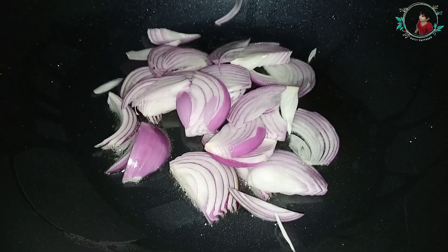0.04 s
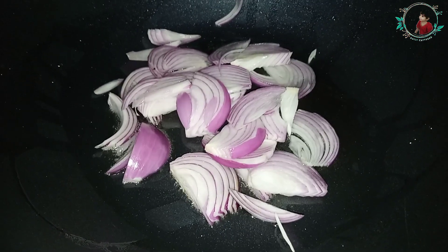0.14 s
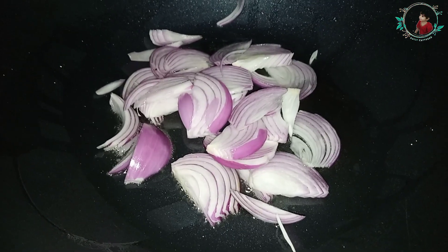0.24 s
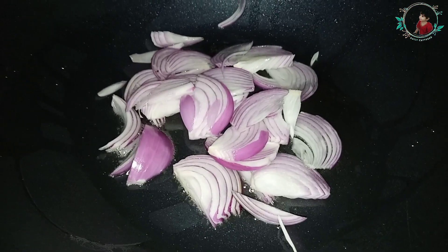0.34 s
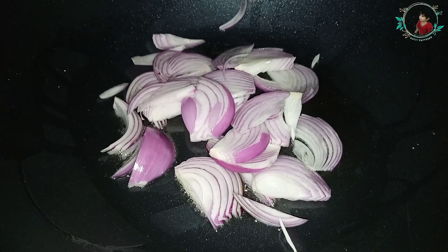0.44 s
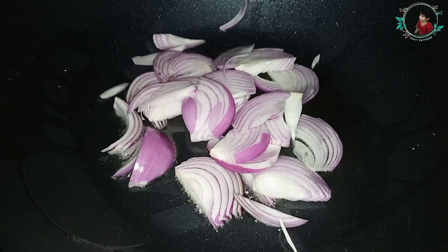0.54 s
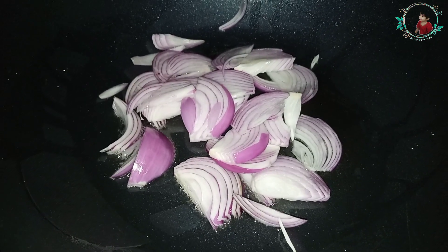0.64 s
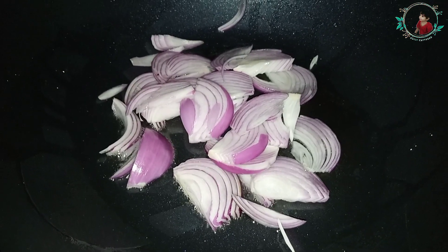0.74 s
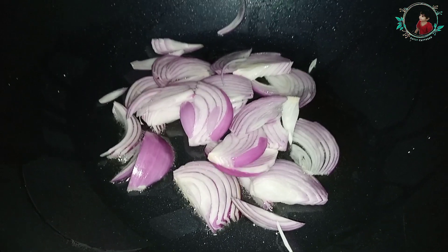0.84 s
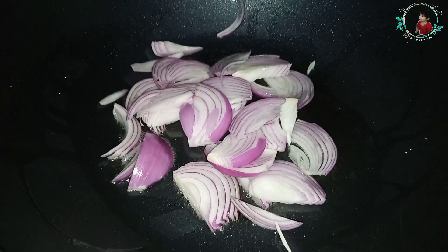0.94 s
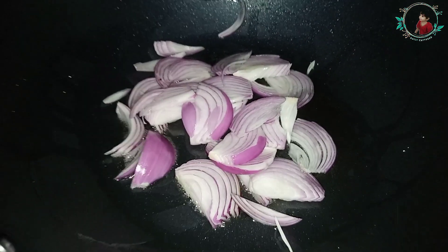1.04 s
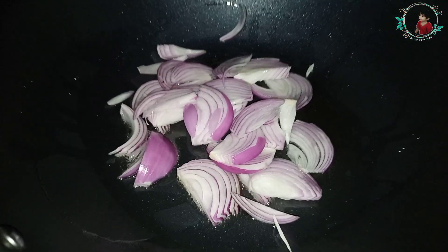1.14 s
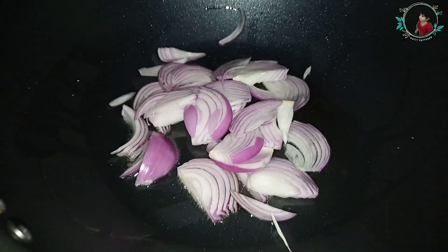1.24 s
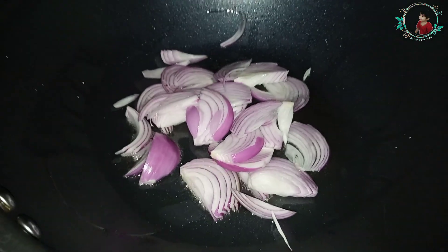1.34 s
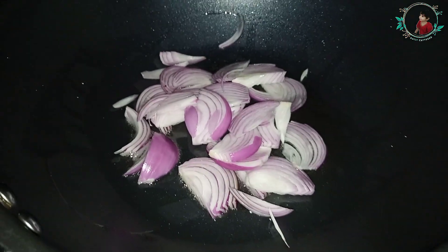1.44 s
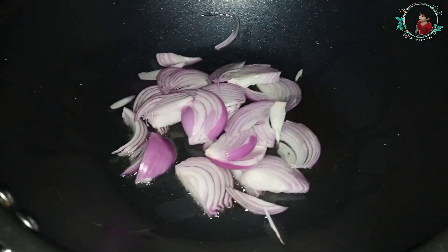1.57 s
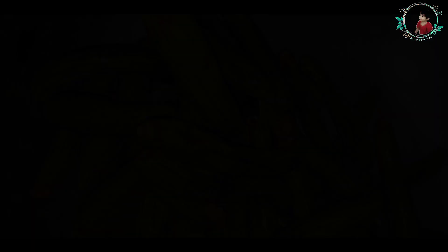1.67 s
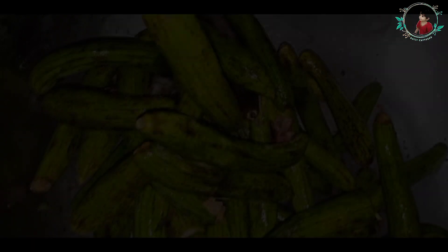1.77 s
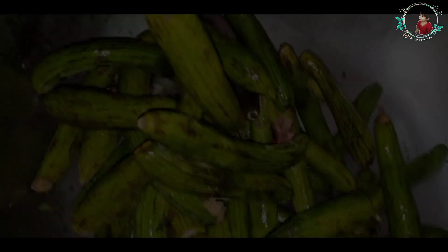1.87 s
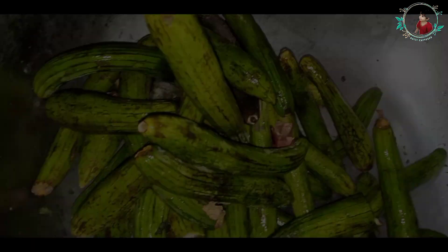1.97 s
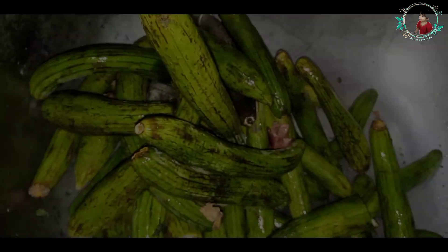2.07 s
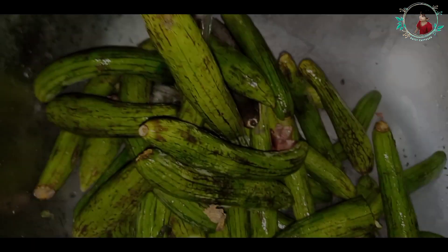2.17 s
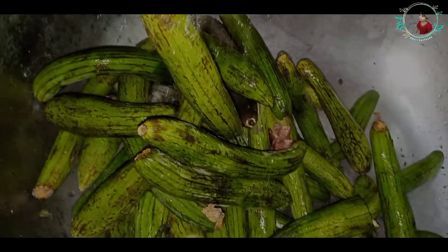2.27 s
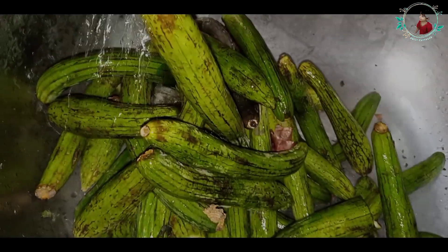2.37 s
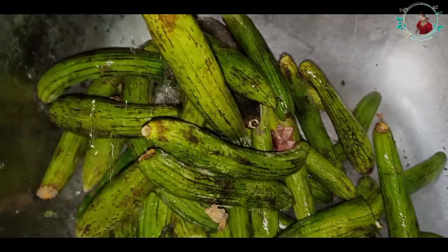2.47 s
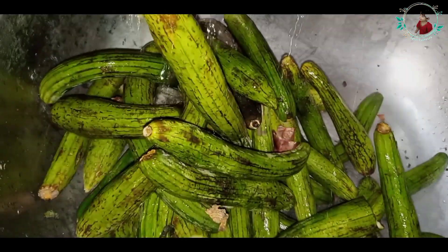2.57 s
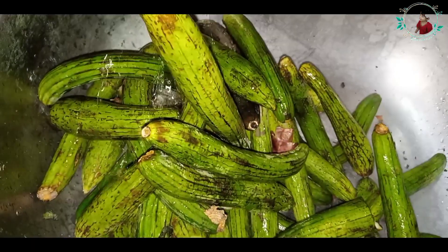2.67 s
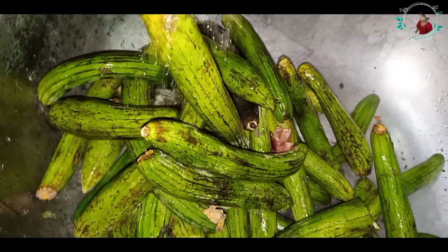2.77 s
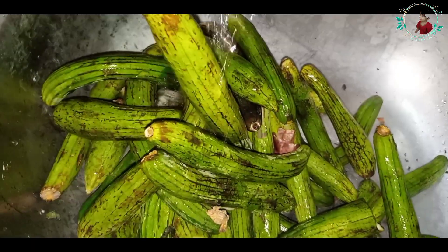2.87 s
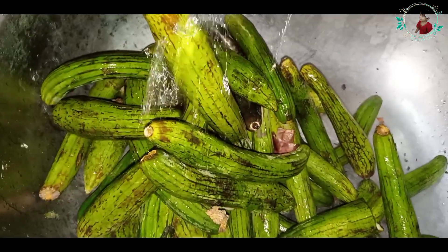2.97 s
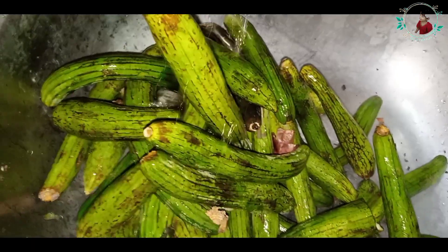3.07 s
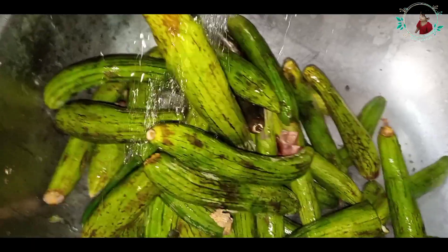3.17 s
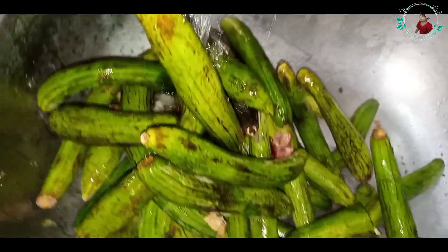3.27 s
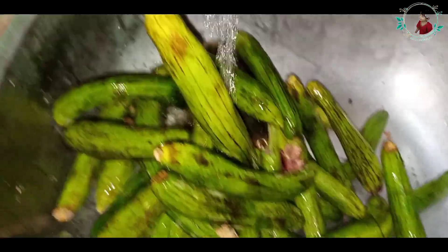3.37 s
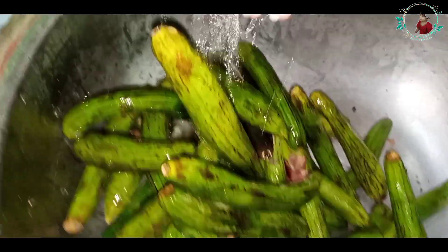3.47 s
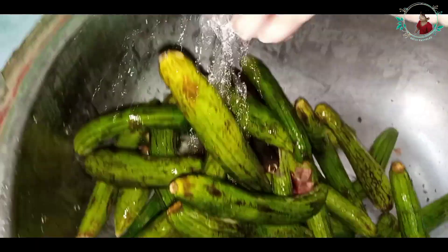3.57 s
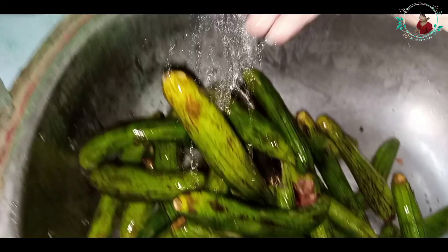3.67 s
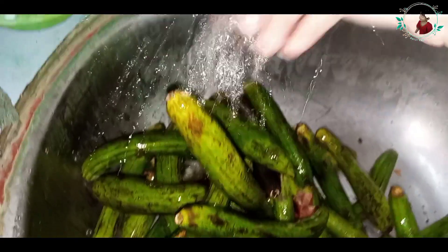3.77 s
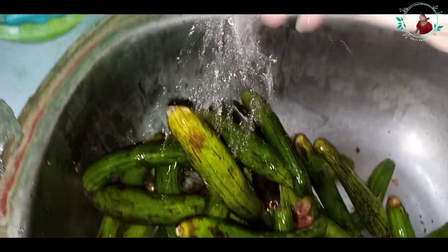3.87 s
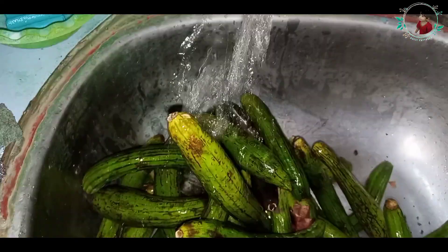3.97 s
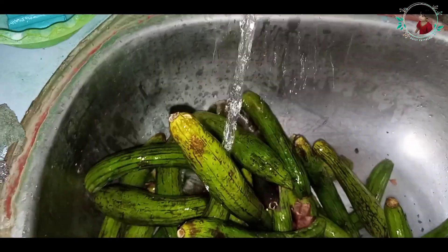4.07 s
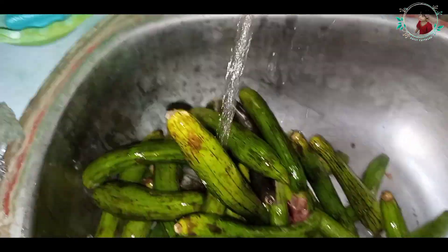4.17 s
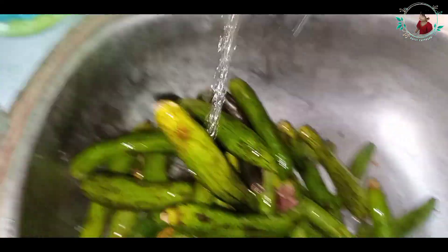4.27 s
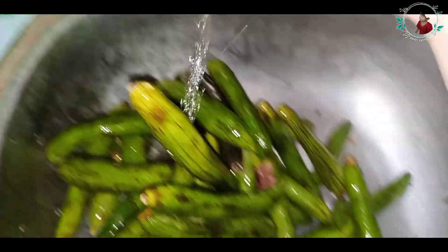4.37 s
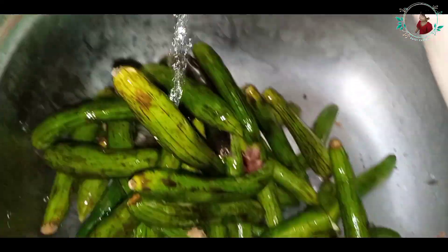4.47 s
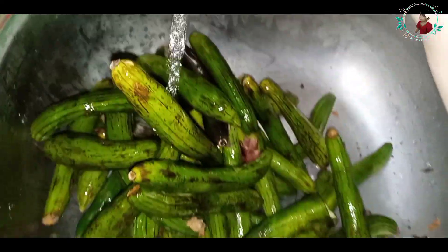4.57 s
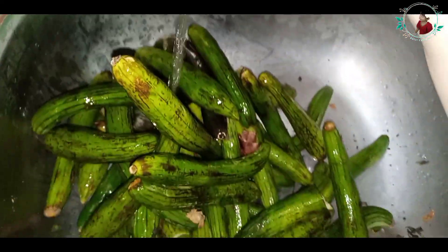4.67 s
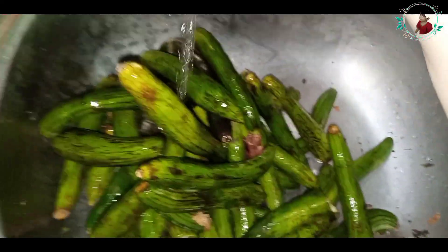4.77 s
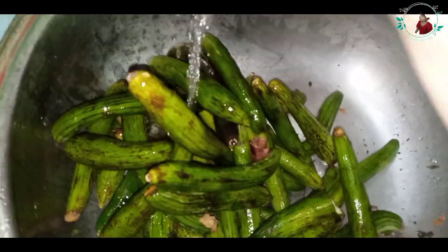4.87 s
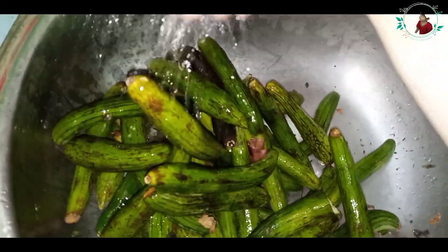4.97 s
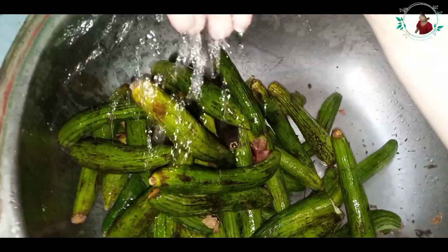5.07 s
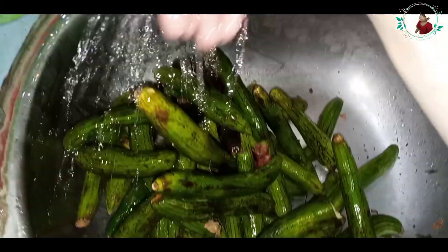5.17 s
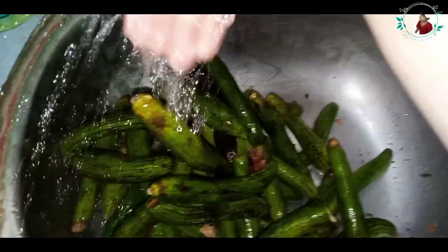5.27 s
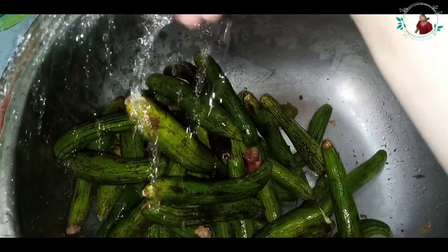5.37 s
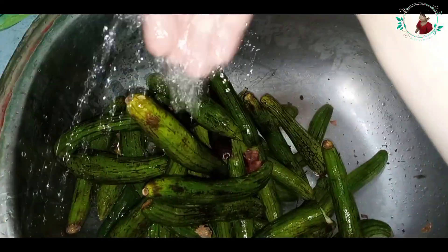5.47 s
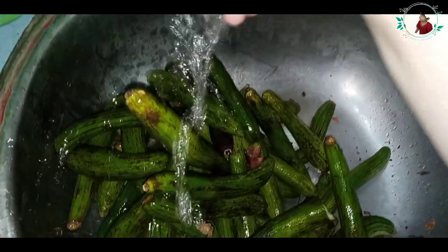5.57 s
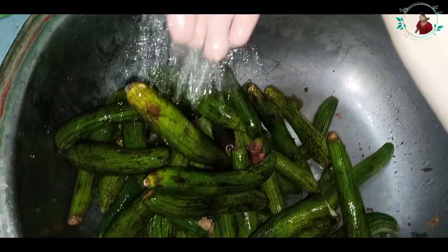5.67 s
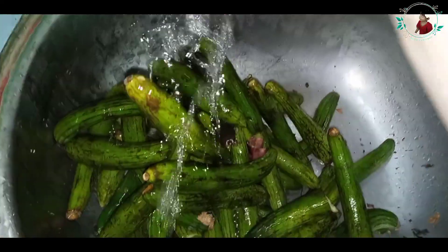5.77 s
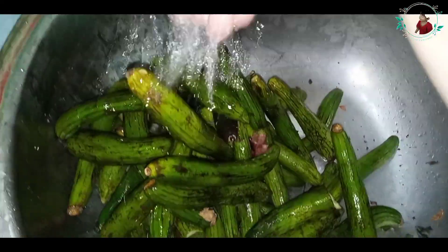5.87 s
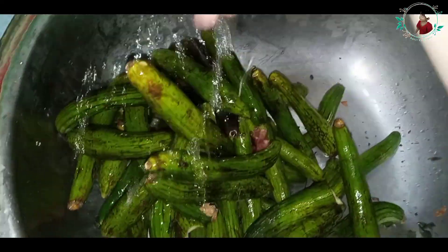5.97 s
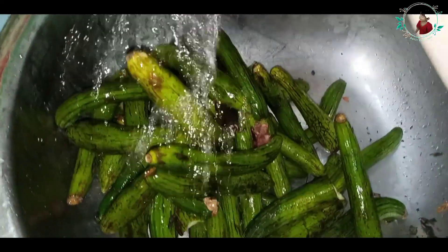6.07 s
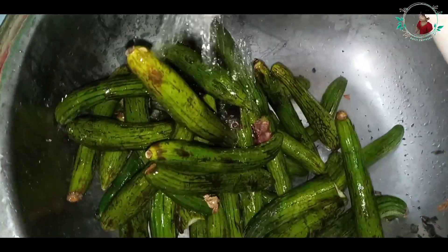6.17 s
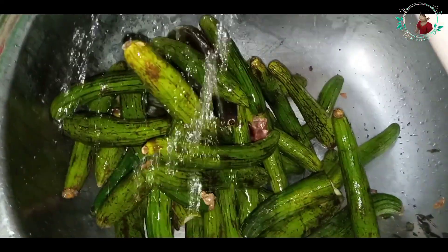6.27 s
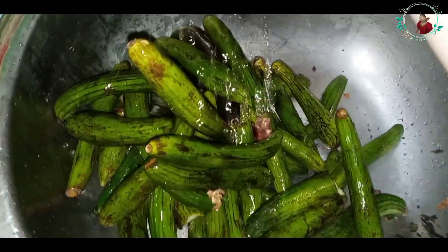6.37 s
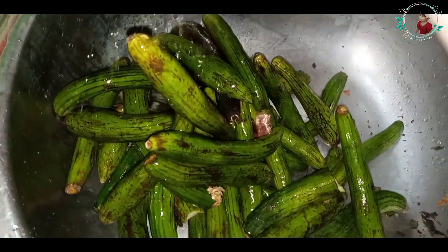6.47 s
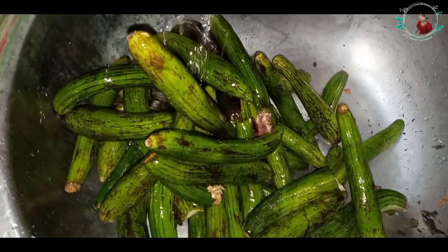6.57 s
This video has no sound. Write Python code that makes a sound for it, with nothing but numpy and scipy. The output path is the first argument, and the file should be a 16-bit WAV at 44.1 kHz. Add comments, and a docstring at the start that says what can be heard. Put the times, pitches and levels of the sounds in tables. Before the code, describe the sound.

Close and quiet, onions fry with a fine soft crackle and a few little pops over low room hum. After under two seconds it cuts to a steel basin: scattered drops plink brightly, a brief jet splashes, then spray hisses off a hand. A longer unbroken stream patters and booms the metal floor, and dense drops and spray return, loudest at the end.

```python
"""Onions sizzle softly in a pan: filtered noise crackles, ringing bubbles pop, and the air hums low.
Then, abruptly, a tap runs over gourds in a steel basin, heard close: a hand breaks the jet into a hiss of
spray and drops that each ring a bubble. Where the jet lands unbroken, first briefly and later for longer,
impulses patter through the basin's modes, and pours boom the floor as a wavering low tone.
Slaps and ticks are noise bursts, brief tones flutter across both scenes, and a quiet kitchen hums behind."""
import sys
import numpy as np
from scipy import signal
from scipy.fft import rfft, irfft, next_fast_len
from scipy.io import wavfile
from scipy.ndimage import uniform_filter1d, map_coordinates

SR = 44100
rng = np.random.default_rng(int(sys.argv[2]) if len(sys.argv) > 2 else 0)


def transcribe(signal):
    """Save signal, clipped to [-1, 1], as a 16-bit WAV file at the path in sys.argv[1]."""
    frames = np.atleast_2d(signal).T
    limited = np.clip(frames, -1, 1)
    pcm = np.round(limited * 32767).astype(np.int16)
    wavfile.write(sys.argv[1], SR, pcm)


N = 291942
TIME = np.arange(N) / SR
SINK_START_S = 1.682
TOP_HZ = 16100

# the jet landing unbroken: (t/s, length/s, base patter level/dB, splash level/dB)
JET_LANDINGS = [(2.223, 0.084, -57.5, -53.5), (4.152, 0.852, -57.5, -65.5)]
# the heaviest blobs within the jet: (t/s, starting level before the splash and knock trims/dB)
JET_BLOBS = [(2.2811, -35.5), (2.302, -42), (2.3212, -37), (2.3458, -45), (4.2308, -35.5), (4.2714, -47),
             (4.4945, -41), (4.5565, -49), (4.8163, -39.5), (4.9157, -37.5), (4.9367, -43)]
# basin resonances: (f/Hz, width/Hz, relative level/dB)
BASIN_MODES = [(217, 18, -12), (297, 17.6, 2), (429, 27, -1), (599.3, 28, 5), (701.5, 48, 3),
               (787, 19.6, 5.5), (862, 37, -4), (1320, 10, -38), (1508, 95, -11.5)]
# colour of the jet's splash: (f/Hz, relative level/dB)
SPLASH_SPECTRUM = [(590, -43), (1000, -2), (1140, 8.5), (1430, -6), (1540, -14), (1630, 3), (2180, -4),
                   (2590, 7), (3190, 4), (4680, 7), (6700, 0), (8850, -23), (13400, -15.5), (15100, 5),
                   (16000, -13)]
# colour of the finest droplets prickling on steel: (f/Hz, relative level/dB)
PRICKLE_SPECTRUM = [(2000, -26), (6000, -24), (8500, -2), (10500, -0.5), (13000, -17), (15200, -24),
                    (16500, -0.5)]
# pours that boom the basin floor: (t/s, length/s, level before it sags/dB)
FLOOR_POURS = [(2.01, 0.022, -53), (2.386, 0.043, -55), (2.475, 0.031, -51), (3.034, .07, -50.5),
               (3.129, 0.066, -54), (3.627, 0.053, -55), (3.713, 0.034, -48), (3.803, .155, -49),
               (4.026, 0.082, -44), (4.132, 0.41, -34), (4.563, 0.17, -37.5), (4.818, 0.093, -54),
               (5.031, 0.061, -53), (5.29, .04, -48.5), (5.364, 0.15, -48.5)]
# the floor's lowest mode, shifting with the load of water: (t/s, f/Hz)
FLOOR_PITCH = [(1.7, 100), (2.35, 106.9), (3.4, 96), (3.8, 84.1), (4.1, 87.05), (4.22, 96.1), (4.38, 95.7),
               (4.48, 103.2), (5.1, 111.3), (5.65, 99), (6.62, 97)]
# colour of the loose rumble: (f/Hz, relative level/dB)
RUMBLE_SPECTRUM = [(20, -39), (42, -9.5), (57, 2), (72, -3.5), (120, -6.5), (180, -16.0), (500, -56.5)]
# the loudest drops: (t/s, bubble level before echoes/dB, bubble pitch f/Hz)
LOUD_DROPS = [(1.764, -54, 2670), (1.891, -42.5, 2820), (2.474, -45.5, 5730), (2.535, -40.5, 5850),
              (2.551, -53, 3940), (2.625, -45.5, 6130), (2.636, -43.5, 3960), (2.758, -37.5, 5930),
              (2.883, -45, 6100), (2.928, -46, 4330), (2.932, -38.5, 7400), (2.941, -33, 4790),
              (3.045, -41.5, 3110), (3.065, -45.5, 3200), (3.085, -33.5, 4740), (3.094, -39.5, 4070),
              (3.245, -53, 2810), (3.273, -44.5, 3790), (3.286, -38.5, 5080), (3.303, -36.5, 3880),
              (3.37, -47.5, 3270), (3.445, -36.5, 6070), (3.461, -39.5, 5700), (3.52, -48, 2970),
              (3.55, -42.5, 5070), (3.608, -46, 4070), (3.618, -42, 4200), (3.623, -48, 2800),
              (3.634, -35.5, 5530), (3.749, -44.5, 4700), (3.801, -32, 3930), (3.806, -36, 2490),
              (3.815, -33.5, 3950), (4.036, -49.5, 5430), (4.153, -40.5, 2400), (4.859, -39, 2665),
              (5.014, -40.5, 5700), (5.044, -43, 2210), (5.085, -43, 5650), (5.099, -32, 5490),
              (5.103, -40, 7320), (5.132, -34.5, 2700), (5.763, -38, 2956), (5.766, -34, 4200),
              (5.871, -36, 5000), (5.895, -39.5, 4540), (5.913, -42, 5120), (5.96, -40, 4620),
              (5.981, -42, 3170), (6.019, -44.5, 3640), (6.045, -32.5, 5200), (6.134, -33, 3850),
              (6.168, -42.5, 3086), (6.213, -41.5, 3485), (6.229, -43, 4300), (6.234, -43.5, 3300),
              (6.235, -42, 6000), (6.261, -38.5, 3460), (6.374, -50, 1940), (6.392, -36.5, 3000),
              (6.402, -40.5, 2760), (6.425, -47, 2140), (6.458, -41.5, 2740), (6.481, -39.5, 3033),
              (6.501, -30, 3420), (6.512, -38, 2210), (6.516, -24, 3345), (6.539, -35, 3100),
              (6.555, -39, 2685)]
# flow of scattered spray: (t/s, level before the fizz and mist trims/dB)
SPRAY_FLOW = [(1.7, -73.5), (2.3, -70), (3.0, -63.5), (3.55, -58), (3.95, -66), (4.25, -53.5), (5.4, -64.5),
              (5.95, -60.5), (6.62, -56.5)]
# colour of the spray's wet hiss: (f/Hz, relative level/dB)
MIST_SPECTRUM = [(880, -46), (1500, -3.5), (1660, -8.5), (1980, 4.5), (2270, -2), (3880, -5.5), (4970, -9),
                 (5770, -4.5), (6890, -14), (8240, -23.5), (13300, -15.5), (15100, -6.5), (16000, -1)]
# droplets ticking on dry steel: (t/s, starting level before trim and echoes/dB)
STEEL_TICKS = [(2.6364, -59), (2.819, -62), (3.1254, -56), (3.1962, -45), (3.9884, -56.5), (4.598, -49),
               (4.777, -45), (6.1132, -35), (6.4351, -44)]
# colour of the ticks: (f/Hz, relative level/dB)
TICK_SPECTRUM = [(300, -34), (4000, 10.5), (8000, -5), (10500, 4.0), (13000, -4), (15200, 14.0), (16500, 9)]
# blobs slapping the basin: (t/s, starting level before trim and echoes/dB)
BASIN_SLAPS = [(2.461, -52.5), (2.622, -51), (2.636, -58.5), (2.675, -69), (2.816, -59), (5.765, -49),
               (5.795, -52.5), (5.958, -55), (6.437, -58)]
# colour of the slaps: (f/Hz, relative level/dB)
SLAP_SPECTRUM = [(150, -39), (400, -6), (650, -11.0), (1000, -11.5), (2500, -9), (6000, -16.5), (9000, -35.0)]
# water running off after the first landing: t/s, length/s
RUNOFF_SPAN = (2.32, 1.17)
# brief tones that swell and fade: (t/s, length/s, f/Hz, level before trim/dB)
BRIEF_TONES = [(0.351, .07, 2770, -66), (.688, 0.089, 4470, -64), (0.793, 0.061, 2580, -62),
               (1.76, 0.025, 2703, -54), (1.909, 0.079, 2940, -62.5), (2.096, 0.11, 3170, -70),
               (2.321, 0.12, 437, -56), (3.311, 0.051, 435, -61.5), (3.538, .11, 591, -65.5),
               (3.734, 0.11, 3950, -56), (5.112, 0.21, 432, -51), (5.67, 0.057, 3343, -56),
               (6.429, 0.047, 598, -61.5)]
# faint gliding squeaks: (t/s, length/s, first f/Hz, last f/Hz, level before trim/dB)
GLIDING_SQUEAKS = [(1.981, 0.056, 2020, 1970, -69.5), (3.114, 0.14, 1910, 2105, -65),
                   (3.365, 0.1, 1965, 1940, -58), (5.354, 0.15, 1860, 2090, -62),
                   (5.486, 0.065, 1920, 1890, -57.5)]
# strength of the frying: (t/s, level/dB)
FRYING_LEVEL = [(0, -65.5), (.3, -65), (.55, -62), (.75, -62.5), (.95, -64.5), (1.3, -64), (1.5, -64.5),
                (1.66, -63.5)]
# oil pops: (t/s, peak level/dB, f/Hz)
OIL_POPS = [(0.217, -52, 4200), (0.428, -45.5, 4460), (0.735, -44.5, 4200), (1.042, -43, 3920),
            (1.143, -56, 5060), (1.369, -50, 4200)]
# colour of the crackling oil: (f/Hz, relative level/dB)
OIL_SPECTRUM = [(530, -55), (900, -62), (1070, -24), (1160, -22), (1530, -25), (1660, -16), (2140, -16),
                (2500, -5.5), (4050, 2), (5160, -11), (6640, -16), (8050, -32.5), (13500, -34),
                (15100, -22), (16000, -55)]
# colour of the air by the pan: (f/Hz, relative level/dB)
STOVE_AIR_SPECTRUM = [(18, -52), (30, -33), (96, -2.5), (159, -16.5), (197, -9), (351, -19.5), (383, -13),
                      (508, -20), (2000, -25.5), (2600, -36), (4400, -120)]
# colour of the kitchen air by the sink: (f/Hz, relative level/dB)
SINK_AIR_SPECTRUM = [(18, -81), (30, -19), (118, -2), (165, -11.5), (287, -19), (437, -13), (721, -21.5),
                     (962, -22.5), (1430, -25.5), (1910, -29), (2980, -29.5), (3220, -32.5), (3490, -28),
                     (7470, -45), (16000, -62)]

JET_ATTACK_S, JET_RELEASE_S = 0.057, 0.099
JET_WAVER_DB, JET_WAVER_PER_S = 3, 20
LANDING_DB, LANDING_S = 5, 0.21  # extra patter on bare steel, and how fast it fades
POOL_S, POOL_RISE_S = 0.56, 0.03  # water has pooled this long after landing; how gradually
POOL_PATTER_DB, POOL_GURGLE_DB = 3, 7.5  # what the pool adds
GURGLE_BASE_DB = -63.5  # before the pool deepens it
KNOCK_TRIM_DB = -7.5  # how hard a heavy blob rings the basin
BOOM_ATTACK_S, BOOM_RELEASE_S, BOOM_SAG_DB_PER_S = 0.065, 0.041, 9.5
# the faint boom between pours, which grows as the basin fills
TRICKLE_START_DB, TRICKLE_SWING_DB, TRICKLE_GROWS_DB_PER_S = -70.5, 3, 1.03
HAZE_S, HAZE_SPREAD = .018, 0.172  # scatter of the haze's rings in time and in log pitch
STRAY_TICK_DB = -65.5  # centre of an 8 dB range, before trim and echoes
DRIP_DB, DRIP_CENTRE_HZ = -71, 4200
PLOP_DB, PLOP_CENTRE_HZ = -73.5, 744
TONE_FLUTTER, SQUEAK_FLUTTER = .1, 0.093  # random flutter steps per cycle of the first pitch


def jet():
    """Falling blobs splash, knock the basin's modes and, once water pools, drag air under."""
    patter = unit(filtered(impacts(rate=300, spread_db=-2.5), basin_response))
    grit = unit(impacts(rate=560, spread_db=-0.5) + 0.25 * rng.standard_normal(N))
    splash = coloured(patchy(grit * amp(4.2 * wobble(130)), depth_db=3.5), SPLASH_SPECTRUM)
    # the finest droplets prickle on the steel
    splash += amp(-18.5) * coloured(impacts(rate=230, spread_db=10.0), PRICKLE_SPECTRUM)
    gurgle = shower(count=3800, centre_hz=1844, spread=0.27, spread_db=2.5, cycles=7)

    blobs = bursts(JET_BLOBS, t60=0.072)
    blob_level = np.std(blobs)
    out = amp(-11.0) * blob_level * coloured(blobs, SPLASH_SPECTRUM)
    out += amp(KNOCK_TRIM_DB) * blob_level * unit(filtered(blobs, basin_response))

    waver = amp(JET_WAVER_DB * wobble(JET_WAVER_PER_S))
    for s, length, patter_db, splash_db in JET_LANDINGS:
        bare = np.exp(-np.abs(TIME - s) / LANDING_S)
        pool = pooled(s)
        patter_gain = amp(patter_db + LANDING_DB * bare + POOL_PATTER_DB * pool) * waver
        gurgle_gain = amp(GURGLE_BASE_DB + POOL_GURGLE_DB * pool)
        landing = patter_gain * patter + amp(splash_db) * splash + gurgle_gain * gurgle
        out += gate(s, length, JET_ATTACK_S, JET_RELEASE_S) * landing
    return out


def basin_response(hz):
    """The steel basin rings in damped modes, summed here with alternating sign."""
    total = 0
    for k, (centre, width, db) in enumerate(BASIN_MODES):
        damping = 1j * hz * width
        total = total + (-1) ** k * amp(db) * damping / (centre ** 2 - hz ** 2 + damping)
    return total


def pooled(s):
    """How much water has gathered, 0-1, under a jet that landed at time s."""
    return .5 + .5 * np.tanh((TIME - s - POOL_S) / POOL_RISE_S)


def drum():
    """Pours boom the thin floor in its lowest mode and a weak second one; pooled water adds a loose rumble."""
    growth_db = TRICKLE_GROWS_DB_PER_S * (TIME - SINK_START_S)
    drive = amp(TRICKLE_START_DB + growth_db + TRICKLE_SWING_DB * wobble(24))
    for s, length, db in FLOOR_POURS:
        sag_db = BOOM_SAG_DB_PER_S * np.clip(TIME - s, 0, 1)
        pour = amp(db - sag_db) * gate(s, length, BOOM_ATTACK_S, BOOM_RELEASE_S)
        drive = np.maximum(drive, pour)
    phase = 2 * np.pi * np.cumsum(curve(FLOOR_PITCH)) / SR + 0.19 * wobble(23)
    boom = unit(np.sin(phase) * amp(.9 * wobble(22)))
    second = unit(np.sin(1.47 * phase + 2.6 * wobble(25)))
    rumble = coloured(rng.standard_normal(N), RUMBLE_SPECTRUM)
    churn = np.zeros(N)
    for s, length, _, _ in JET_LANDINGS:
        churn += pooled(s) * gate(s, length, JET_ATTACK_S, release_s=0.48)
    return drive * (boom + amp(-18) * second + amp(-14.5) * rumble) + amp(-54.5) * churn * rumble


def drops():
    """Each drop rings clearly between the basin's walls, with a faint blurred haze of short rings around its pitch."""
    out = np.zeros(N)
    for s, db, hz in LOUD_DROPS:
        ping = bubble(hz, cycles=4.2 * np.exp(.25 * rng.standard_normal()), rise_cycles=1.6)
        walls = echoes(wet_db=-7, t60=.035)
        add(out, s, amp(db) * signal.fftconvolve(ping, walls))
        haze = np.clip(rng.standard_normal((26, 3)), -2, 2)
        for lag, strength, pitch in haze:
            ring = bubble(hz * np.exp(HAZE_SPREAD * pitch), cycles=9.7, rise_cycles=1.9)
            # quieter the further it strays from the haze's centre in time
            ring_db = 0.74 * db - 35.5 + 3.8 * strength - 3.1 * abs(lag)
            add(out, s + .006 + HAZE_S * lag, amp(ring_db) * ring)
    return out


def spray():
    """Droplets off the hand hiss finely, and tiny bubbles come out as the spray grows heavier."""
    flow = amp(curve(SPRAY_FLOW))
    fizz = shower(count=1200, centre_hz=4200, spread=0.2606, spread_db=0.5, cycles=23)
    fizz = unit(signal.fftconvolve(fizz, echoes(wet_db=5.0, t60=0.081))[:N])
    grit = rng.standard_normal(N) + 0.47 * impacts(rate=110, spread_db=6.5)
    grit = grit * amp(6.0 * wobble(50))
    mist = coloured(patchy(grit, depth_db=2.5), MIST_SPECTRUM)
    heaviness = np.sqrt(unit(flow))
    return flow * (amp(-11) * heaviness * fizz + amp(-6.5) * mist)


def slaps():
    """Bigger blobs land with a dull, broad slap."""
    hits = bursts(BASIN_SLAPS, t60=0.11)
    return amp(-5.0) * np.std(hits) * coloured(hits, SLAP_SPECTRUM)


def ticks():
    """Droplets that hit bare steel give a bright tick with no bubble."""
    first = JET_LANDINGS[0][0]
    strays = []
    for when, size in rng.random((30, 2)):
        strays.append((first + when * (TIME[-1] - first), STRAY_TICK_DB + 8 * (size - .5)))
    hits = bursts(list(STEEL_TICKS) + strays, t60=0.028)
    return amp(-1.5) * np.std(hits) * coloured(hits, TICK_SPECTRUM)


def drips():
    """Stray drops ring at random once the jet has wetted the gourds; larger run-off bubbles plop softly."""
    pings = shower(count=160, centre_hz=DRIP_CENTRE_HZ, spread=.3, spread_db=5, cycles=4.9)
    pings = unit(signal.fftconvolve(pings, echoes(wet_db=-2.5, t60=0.07))[:N])
    plops = shower(count=170, centre_hz=PLOP_CENTRE_HZ, spread=0.355, spread_db=3, cycles=10)
    wetted = TIME > JET_LANDINGS[0][0]
    runoff = gate(*RUNOFF_SPAN, attack_s=0.09, release_s=0.39)
    return amp(DRIP_DB) * wetted * pings + amp(PLOP_DB) * runoff * plops


def frying():
    """Moisture boils off the onions in hot oil as fine crackle, with a few ringing pops."""
    crackle = unit(impacts(rate=360, spread_db=-1.0) + 1.7 * rng.standard_normal(N))
    out = amp(curve(FRYING_LEVEL)) * coloured(patchy(crackle, depth_db=1.5), OIL_SPECTRUM)
    for s, db, hz in OIL_POPS:
        add(out, s, amp(db) * bubble(hz, cycles=3.6, rise_cycles=0.84))
    return out


def tones():
    """Nearly pure tones and brighter squeaks flutter, swell and fade among the other sounds."""
    out = np.zeros(N)
    for s, length, hz, db in BRIEF_TONES:
        tone = wavering(length, hz, hz, TONE_FLUTTER, flutter_db=2.5, octave_db=-29.5)
        add(out, s, amp(db - 2) * tone)
    for s, length, first_hz, last_hz, db in GLIDING_SQUEAKS:
        squeak = wavering(length, first_hz, last_hz, SQUEAK_FLUTTER, flutter_db=3, octave_db=-9.5)
        add(out, s, amp(db - 2.5) * squeak)
    return out


def stove_air():
    """Still air by the pan: low-coloured noise whose bands swell and sink a little."""
    return amp(-73) * coloured(patchy(rng.standard_normal(N), depth_db=1.0), STOVE_AIR_SPECTRUM)


def sink_air():
    """The quiet kitchen hums as steady noise, strongest in the lows."""
    return amp(-66.5) * coloured(rng.standard_normal(N), SINK_AIR_SPECTRUM)


def bubble(hz, cycles, rise_cycles):
    """A bubble rings for a few cycles; envelope peak 1."""
    turns = hz * TIME[:SR // 50]
    shape = np.exp(-turns / cycles) * (1 - np.exp(-(turns / rise_cycles) ** 2))
    return shape / shape.max() * np.sin(2 * np.pi * turns)


def shower(count, centre_hz, spread, spread_db, cycles):
    """Bubbles of random size, strength and time, at rms 1."""
    out = np.zeros(N)
    starts = rng.uniform(0, N / SR, count)
    characters = np.clip(rng.standard_normal((count, 2)), -2, 2)
    for s, (strength, size) in zip(starts, characters):
        ring = bubble(centre_hz * np.exp(spread * size), cycles, rise_cycles=0.52)
        add(out, s, amp(spread_db * strength) * ring)
    return unit(out)


def impacts(rate, spread_db):
    """Random impulses, rate a second, of uneven strength, at rms 1."""
    size = amp(spread_db * np.clip(rng.standard_normal(N), -2, 2))
    return unit((rng.random(N) < rate / SR) * size * rng.choice([-1, 1], N))


def bursts(rows, t60):
    """Short dying bursts of noise, one for each (t/s, level/dB) row."""
    out, t = np.zeros(N), TIME[:SR // 15]
    for s, db in rows:
        add(out, s, amp(db - 60 * t / t60) * rng.standard_normal(len(t)))
    return out


def wavering(length, first_hz, last_hz, flutter, flutter_db, octave_db):
    """A gliding tone with weak overtones that flutters in level and pitch as it swells and fades."""
    t = TIME[:int(length * SR)]
    knots = rng.standard_normal((2, 200))
    swell, waver = (map_coordinates(k, [t * flutter * first_hz]) for k in knots)
    phase = 2 * np.pi * np.cumsum(np.linspace(first_hz, last_hz, len(t))) / SR
    wave = amp(flutter_db * swell) * np.exp(1j * (phase + 0.88 * waver))
    # powers of the complex wave give its second and third harmonics
    overtones = unit((wave ** 2 + 0.3 * wave ** 3).real)
    tone = unit(wave.real) + amp(octave_db) * overtones
    return np.abs(np.sin(np.pi * t / length)) ** 0.58 * tone


def echoes(wet_db, t60):
    """A direct sound followed by dense reflections."""
    t = TIME[:SR // 5]
    tail = rng.standard_normal(len(t)) * amp(-60 * t / t60) * (t > .0008)
    return (t == 0) + amp(wet_db) * tail / np.linalg.norm(tail)


def patchy(x, depth_db):
    """Each region of the spectrum swells and sinks on its own; result at rms 1."""
    z = signal.stft(x, nperseg=256)[2]
    field = uniform_filter1d(rng.standard_normal(z.shape), size=5, axis=0)  # smooth over frequency
    field = uniform_filter1d(field, size=6, axis=1)  # smooth over time
    return unit(signal.istft(z * amp(depth_db * unit(field)), nperseg=256)[1][:N])


def coloured(x, spectrum):
    """x with a (f/Hz, level/dB) spectrum, at rms 1."""
    f, db = np.transpose(spectrum)
    return unit(filtered(x, lambda hz: amp(np.interp(np.log(hz + 1), np.log(f + 1), db))))


def filtered(x, response):
    """x times a response of frequency."""
    size = next_fast_len(N + SR // 2)
    return irfft(rfft(x, size) * response(np.fft.rfftfreq(size, 1 / SR)), size)[:N]


def gate(s, length, attack_s, release_s):
    """A smooth rise from time s, a hold, and a smooth fall once length is over."""
    rise = np.clip((TIME - s) / attack_s, 0, 1)
    fall = np.clip(1 - (TIME - s - length) / release_s, 0, 1)
    return np.sin(np.pi / 2 * rise) ** 2 * fall ** 2


def wobble(rate):
    """A smooth random curve with rate knots a second, at rms 1."""
    return unit(map_coordinates(rng.standard_normal(int(N * rate / SR) + 4), [TIME * rate]))


def curve(rows):
    """The second column of a table, joined by straight lines in time."""
    rows = np.asarray(rows)
    return np.interp(TIME, rows[:, 0], rows[:, 1])


def add(track, s, sound):
    """Mix a sound into a track at time s."""
    start = max(int(s * SR), 0)
    part = track[start:start + len(sound)]
    part += sound[:len(part)]


def unit(x):
    """Scale to rms 1."""
    return x / np.sqrt(np.mean(x ** 2) + 1e-20)


def amp(db):
    """Decibels to gain."""
    return 10 ** (np.asarray(db) / 20)


def scene():
    """The pan gives way to the sink; the kitchen answers drops, ticks and slaps faintly."""
    water = signal.fftconvolve(drops() + ticks() + slaps(), echoes(wet_db=-4.0, t60=0.05))[:N]
    sink = water + jet() + drum() + spray() + drips() + sink_air()
    pan = frying() + stove_air()
    return (np.where(TIME < SINK_START_S, pan, sink) + tones())[None]


def record(dry):
    """Keep nothing above the band limit."""
    return filtered(dry[0], lambda hz: hz < TOP_HZ)[None]


dry = scene()
out = record(dry)
transcribe(out)
```